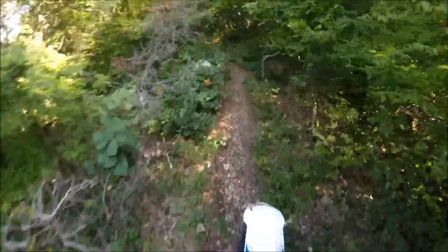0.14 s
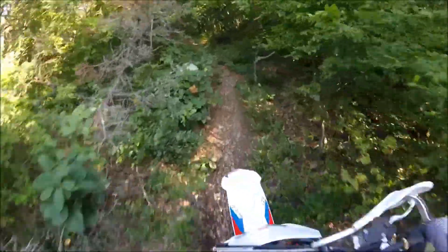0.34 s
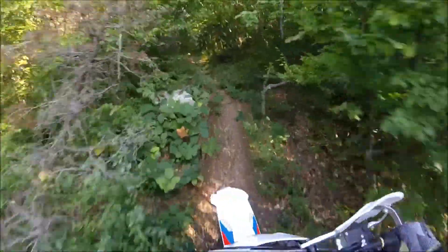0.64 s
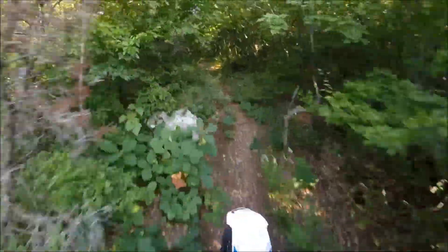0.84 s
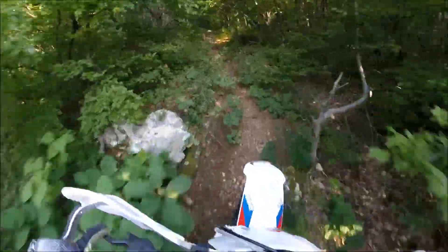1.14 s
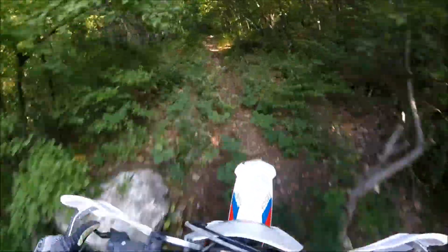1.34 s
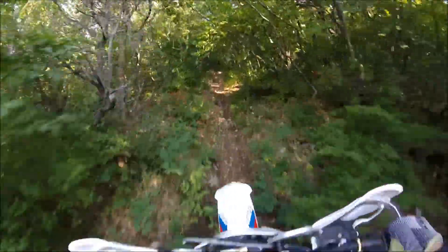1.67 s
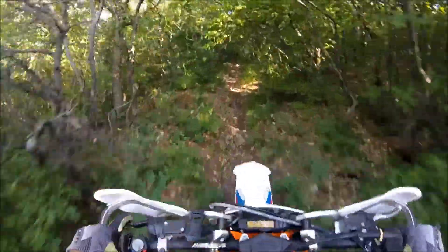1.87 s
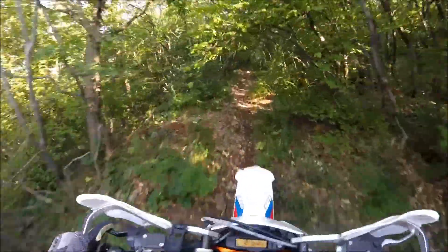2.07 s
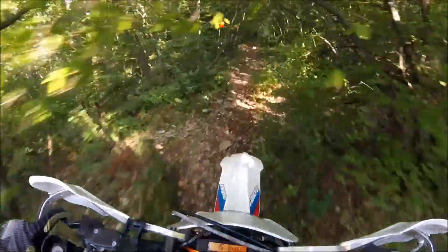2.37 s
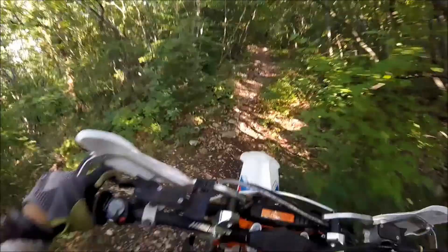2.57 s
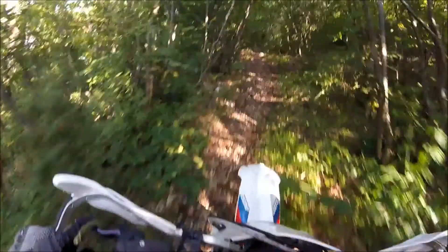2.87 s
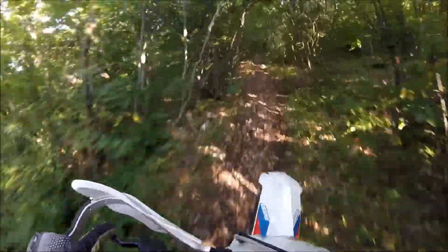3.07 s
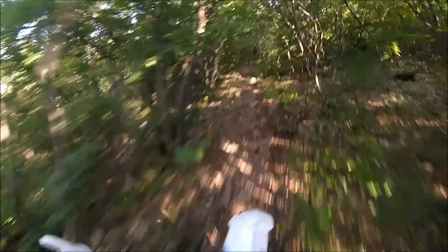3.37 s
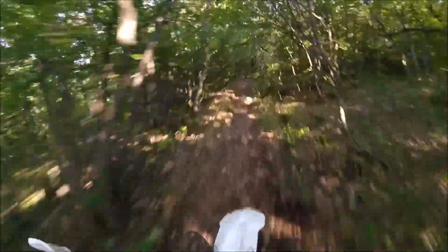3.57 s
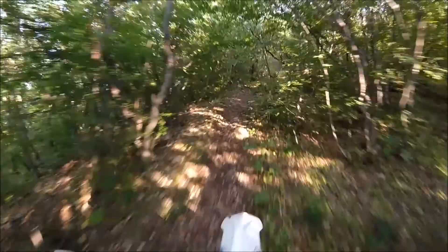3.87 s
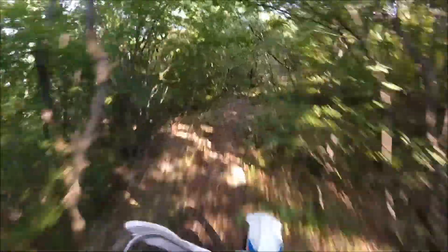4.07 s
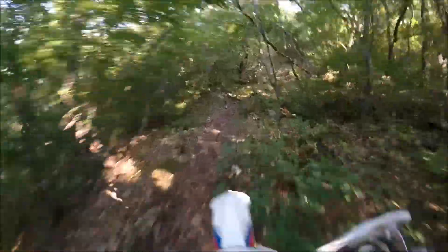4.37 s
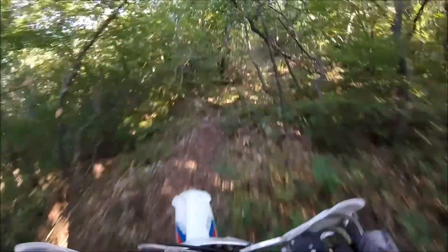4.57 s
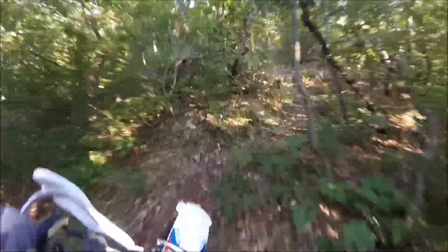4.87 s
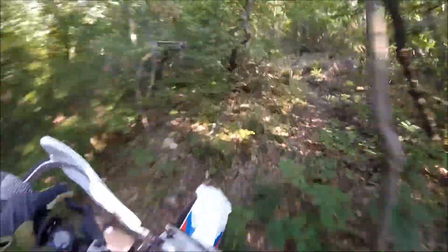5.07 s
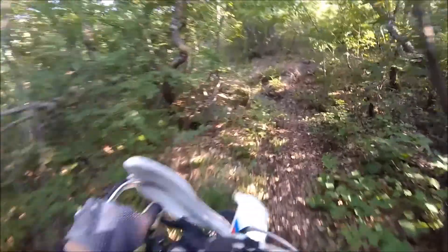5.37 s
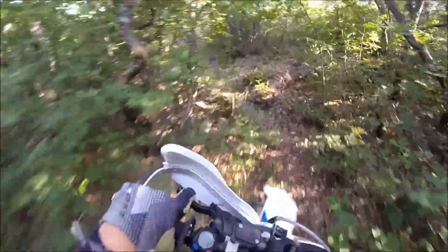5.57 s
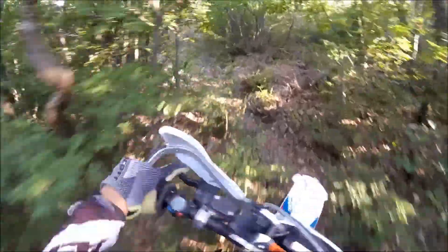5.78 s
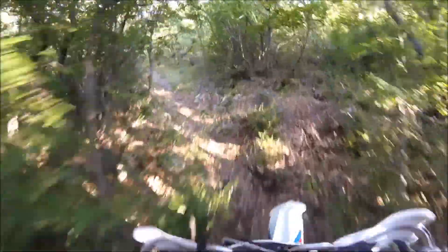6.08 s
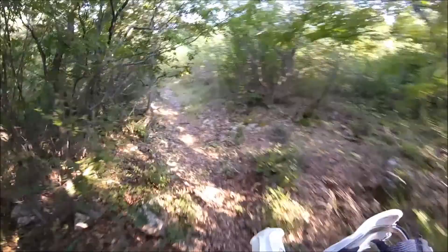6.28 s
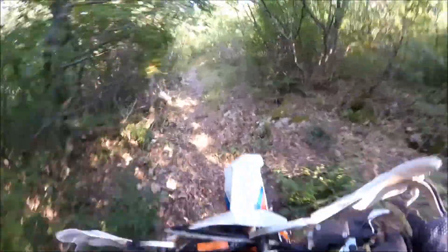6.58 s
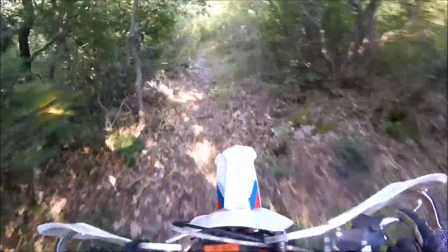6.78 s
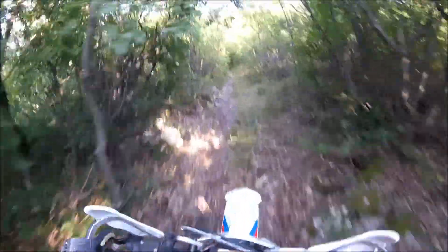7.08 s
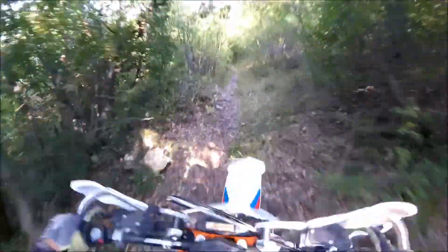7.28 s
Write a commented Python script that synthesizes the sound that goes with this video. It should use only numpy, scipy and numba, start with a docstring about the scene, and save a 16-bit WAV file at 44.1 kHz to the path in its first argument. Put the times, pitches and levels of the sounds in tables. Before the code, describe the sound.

A two-stroke dirt bike rides up a forest trail, heard close from the rider's helmet. The engine sputters at low revs, pulls in short raspy bursts, and climbs to a high peak about halfway. It then drops back, popping, and labours at low revs with a thin metallic whine. Twigs knock on the helmet three times, light wind buffets the microphone, and the chain clatters near the end.

```python
"""A two-stroke dirt bike rides up a forest trail, heard from the rider's helmet.
Under throttle it fires once per turn of the crank, and the pulses ring the exhaust pipe into a drone;
at small openings it sputters in single pops. Rushing gas rasps, the air intake hums, the gears whine
and the engine's metal rings. Behind it the chain clatters, twigs knock on the helmet, a pebble ticks
off the frame and wind buffets the microphone."""
import sys
import numpy as np
from scipy import signal
from scipy.io import wavfile
from scipy.ndimage import uniform_filter1d
from numba import njit

SR = 44100
rng = np.random.default_rng(int(sys.argv[2]) if len(sys.argv) > 2 else 0)


def wav_record(signal):
    """Record a signal, one row per channel, as 16-bit PCM in the file named by sys.argv[1]."""
    frames = np.transpose(np.atleast_2d(signal))
    bounded = np.clip(frames, -1, 1)
    # unit amplitude maps onto the largest positive 16-bit level
    quanta = np.round(bounded * 32767).astype(np.int16)
    wavfile.write(sys.argv[1], SR, quanta)


N = 327222
TIME = np.arange(N) / SR

# Wind on the microphone: time_s, level_db
WIND_LEVEL = [(0, -28), (0.95, -29), (1.12, -24), (1.3, -29), (1.7, -38), (2.3, -33), (2.9, -37),
              (3.5, -39), (3.9, -31), (4.2, -36), (4.9, -39), (5.2, -32), (6.45, -32), (6.75, -27),
              (7.42, -24)]
# Jolts that push air at the microphone: start_s, level_db, pitch_hz
JOLTS = [(4.533, -13, 64.5), (4.547, -9, 63.5), (4.563, -14, 63), (4.581, -12.5, 62), (4.809, -17.5, 27.1),
         (5.239, -14, 25.2), (5.28, -39, 24.42), (5.317, -18, 30.2)]
# Tone of the wind (a tone says how strong each frequency is): frequency_hz, gain_db
WIND_TONE = [(4, -34), (18, -8), (32, -3), (50, -6), (80, -10), (150, -12), (400, -12), (2000, -60)]
# Notes of the struck frame and helmet: pitch_hz, level_db, ring_s (time to fade by 60 dB)
FRAME_NOTES = [(2450, 2, 0.0093), (2860, -10, 0.0093), (4700, -18, 0.02)]
HELMET_NOTES = [(390, 14, 0.017), (615, -3, 0.15), (780, 5, 0.015), (1123, -7, 0.19), (1736, 6.5, 0.037),
                (2140, 3, 0.03), (2340, -3, 0.058), (3930, 8.5, 0.008), (5060, 14.5, 0.017)]
# Twigs hitting the helmet: start_s, crack_db, thud_db, scrape_s
TWIG_HITS = [(1.116, -16, -15, 0.0083), (1.134, -27, -32, 0.015), (1.156, -28, -35, 0.014),
             (2.6057, -19, -43, 0.0073), (2.6116, -16, -8, 0.0073), (2.662, -13.5, -16, 0.011),
             (2.6783, -22, -15, 0.0038), (2.693, -18.5, -23, 0.01), (2.703, -25.5, -23, 0.009),
             (4.5275, -6.5, -38, 0.0027), (4.5305, -9, -33, 0.0057), (4.5425, -23, -19, 0.008),
             (4.548, -20, -12.5, 0.012), (4.56, -28, -16, 0.008), (4.5677, -17, -20, 0.007)]
# Tones of a twig's crack, its thud and the chain: frequency_hz, gain_db
CRACK_TONE = [(150, -33), (500, -27), (1200, 13), (1500, -14), (2100, 13), (3800, -7), (5200, 10),
              (6500, 5), (8000, -6), (9500, -16.5), (11000, -29)]
THUD_TONE = [(30, -23), (80, -4), (280, 2), (550, -3), (1000, -12.5), (3000, -110)]
CHAIN_TONE = [(400, -24.5), (950, 10), (1550, -3), (2100, 0.5), (3800, -19.5), (6200, -6.5), (11000, -48)]
# Chain clatter over rough ground: time_s, level_db
CHAIN_LEVEL = [(6.4, -64), (6.6, -37), (6.85, -25.5), (7.42, -26.5)]

# Engine speed, in turns of the crank per second: time_s, speed_hz
ENGINE_SPEED = [(0.0, 44.9), (0.06, 43.2), (0.14, 62.0), (0.25, 52.9), (0.35, 58.0), (0.43, 42.1),
                (0.54, 41.4), (0.74, 45.2), (0.85, 42.0), (0.97, 53.1), (1.07, 45.8), (1.22, 55.1),
                (1.45, 56.0), (1.53, 65.5), (1.58, 66.0), (1.65, 73.5), (1.71, 73.3), (1.8, 78.2),
                (1.92, 65.1), (2.03, 65.6), (2.12, 53.2), (2.23, 52.2), (2.34, 55.0), (2.43, 53.4),
                (2.5, 60.0), (2.56, 60.5), (2.64, 66.3), (2.75, 57.8), (2.79, 66.8), (2.91, 60.2),
                (2.99, 74.0), (3.06, 69.2), (3.15, 80.5), (3.2, 77.6), (3.25, 77.8), (3.32, 75.0),
                (3.37, 82.5), (3.43, 108.5), (3.475, 125.5), (3.554, 116.3), (3.642, 119.7), (3.686, 106.9),
                (3.76, 85.0), (3.86, 65.0), (3.95, 88.0), (4.0, 87.0), (4.08, 67.5), (4.2, 63.0),
                (4.4, 58.0), (4.73, 53.2), (4.83, 47.7), (5.08, 42.5), (5.41, 45.1), (5.62, 38.0),
                (5.89, 43.2), (6.1, 40.5), (6.3, 42.5), (6.45, 38.1), (6.68, 44.9), (6.78, 37.6),
                (6.96, 43.5), (7.05, 36.3), (7.23, 33.8), (7.42, 41.2)]
# Stretches of open throttle; overlapping rows continue one pull with a new tone or loudness:
# start_s, end_s, drone_db, hum_db, rasp_and_ring_db, lower_note_ratio, upper_note_ratio,
# note_width_hz, echo_share. The ratios times engine speed give the pipe's notes.
THROTTLE_STRETCHES = [(-0.03, 0.52, -4.5, -4.5, -3, 5.6, 15, 40, 0),
                      (0.045, 0.165, -1, 6.5, -1, 3.6, 11, 40, 0.17),
                      (0.223, 0.333, 2, 0.5, -8, 5.6, 7.7, 40, 0.21),
                      (0.486, 0.965, -2.5, -0.5, 0, 6.4, 8, 32, 0.5),
                      (1.036, 1.455, 2, 1.5, 2.5, 4.65, 9.5, 73.4, 0),
                      (1.43, 1.63, 0.5, 1, 1.5, 4.44, 4.67, 60, 0),
                      (1.592, 1.783, -1, -1, 1.5, 3.8, 4.88, 69, 0.039),
                      (1.954, 2.456, -0.5, 1, 0.5, 4.05, 7.4, 32.6, 0),
                      (2.387, 2.547, 1.5, -3, 0, 4.25, 7.5, 36, 0.088),
                      (2.6, 2.666, -6, 2.5, -1.5, 4.2, 9, 32, 0.06),
                      (2.72, 2.79, -3, -10, -1, 4, 7.4, 32, 0),
                      (2.873, 3.427, -3, -8, -3.5, 3.71, 6.8, 36, 0.2),
                      (3.379, 3.635, 1.5, -8.5, -5.5, 2.67, 3.5, 60, 0.12),
                      (3.854, 3.971, -7, -10, -6.5, 3.38, 7, 32, 0.5),
                      (5.036, 5.482, -9, -10.5, -5.5, 5.6, 7.8, 32, 0.12),
                      (5.617, 6.234, -3, 2, 1, 6.2, 10, 32.8, 0.14),
                      (6.483, 6.688, -1.5, 3.5, 1.5, 6.4, 12, 32, 0.042),
                      (6.722, 7.01, -1.5, 3.5, 2.5, 6.1, 9, 33.3, 0.26),
                      (6.99, 7.27, -1.5, 7, 6, 6, 8, 32, 0.35),
                      (7.226, 7.45, -1, 6.5, 4, 6.7, 10.3, 32, 0.4)]
# How much the engine sputters: time_s, sputter_share (0 is clean running)
SPUTTER_SHARE = [(0, .2), (.09, .75), (.36, .9), (.45, .4), (.62, .08), (.88, .08), (.94, .4), (1.04, 0),
                 (2.6, 0), (2.68, .35), (2.93, 0), (3.8, 0), (4.9, .2), (5.05, .9), (5.5, .9), (5.72, .1),
                 (6.55, .15), (6.8, .05)]
# Lone hard firings of built-up unburnt fuel: time_s, pop_db, knock_db
LONE_POPS = [(0.1541, -31, -32), (0.293, -22, -32.5), (0.3264, -17, -32.5), (0.3986, -17, -30),
             (0.464, -15, -33), (0.507, -10, -27), (0.5532, -11, -37), (0.5974, -27, -39),
             (0.937, -7.5, -36), (0.972, -13, -36), (1.996, -10.5, -40), (2.0091, -21, -25.5),
             (2.863, -12.5, -31), (3.8896, -9.5, -49), (4.4051, -14.5, -29), (4.469, -16, -43),
             (4.505, -15, -44), (4.646, -18.5, -52), (4.9433, -18, -35.5), (5.095, -26, -31),
             (5.1584, -16, -33), (5.2256, -19, -31), (5.286, -20, -32.5), (5.3549, -31, -28.5),
             (5.427, -13.5, -28.5), (5.4679, -16, -28), (5.699, -7, -45), (6.346, -17, -29),
             (6.455, -15.5, -30), (6.478, -13, -45), (6.5359, -10.5, -45), (6.656, -19, -35)]
# Exhaust with the throttle open: speed_hz, drone_db
OPEN_DRONE = [(34, -19.5), (40, -16.5), (44, -16), (52, -18.5), (56, -16), (61, -12), (68, -13), (75, -15),
              (88, -13), (115, -13)]
# Other engine sounds with the throttle open: speed_hz, hum_db, rasp_db, ring_db
OPEN_LEVELS = [(36.3, -32.5, -32, -37), (39.5, -28, -31, -34.5), (61, -29, -25, -33),
               (61.1, -35.5, -26.5, -35), (78.8, -18.5, -22, -28.5), (113, -15.5, -16, -24)]
# The engine with the throttle shut: speed_hz, hum_db, rasp_db, ring_db, drone_db
SHUT_LEVELS = [(40.2, -39.5, -36.5, -38.5, -44), (46.5, -37.5, -39.5, -45.5, -38.5),
               (51.3, -38.5, -41, -44.5, -41), (61.4, -27, -33.5, -40.5, -36), (81, -32, -32.5, -38.5, -40)]
# Gear whine, loudest at low pitch and mostly weaker as it rises: pitch_hz, gain_db
WHINE_TONE = [(900, -8), (1200, -9.5), (1360, -15.5), (1550, -18), (2050, -12), (2600, -26)]
# A metal engine part sings: start_s, end_s, first_hz, last_hz, level_db
SINGING_NOTES = [(0.28, 0.433, 1300, 1295, -43), (0.54, 0.92, 1150, 1150, -40.5),
                 (0.953, 1.05, 1600, 1330, -36.5), (1.05, 1.237, 1240, 1450, -29),
                 (1.24, 1.365, 1440, 1370, -33.5), (1.598, 1.816, 890, 930, -35),
                 (2.04, 2.483, 1306, 1336, -34), (2.914, 3.363, 893, 910, -37),
                 (3.385, 3.488, 2020, 2080, -29), (3.935, 4.016, 2130, 2050, -38),
                 (4.151, 4.275, 1355, 1270, -41), (4.898, 5.627, 1290, 1270, -45.5),
                 (5.795, 6.01, 1250, 1230, -42), (6.89, 7.012, 1300, 1266, -32.5)]
# Tones of the ringing cylinder and the sizzling gas: frequency_hz, gain_db
CYLINDER_TONE = [(2000, -2), (3500, -10), (4300, -14.5), (5000, -5), (5800, 0), (6250, -2.5), (6570, 5.5),
                 (6900, -2.5), (7500, -9), (8500, -11.5), (10000, -21), (11500, -35)]
SIZZLE_TONE = [(5000, -31), (8500, 7), (10000, 1), (11500, -5.5)]
# The sizzle grows near top speed: speed_hz, gain_db
SIZZLE_LEVEL = [(50, -41), (75, -50), (115, -26)]
# Tones of a gas pulse's front and the jet behind it: frequency_hz, gain_db
FRONT_TONE = [(400, -10.5), (650, 7.5), (880, 5), (1100, 1), (1320, 10.5), (1500, 3.5), (1750, -2.5),
              (2100, -9), (2700, -12), (5000, -51.5)]
JET_TONE = [(100, -40), (300, -14.5), (600, 1.5), (950, -4.5), (1120, -4), (1250, -4), (1360, -5),
            (1480, -9), (1600, -14), (2100, -9), (2700, -17), (3400, -23), (4200, -23), (8000, -39.5),
            (12000, -93)]
# How far the fronts stand out of the jet when pulling hard: speed_hz, gain_db
FRONT_LEVEL = [(42, -4), (54, 1.5), (68, 1), (80, 2), (115, 4)]
# Tones of the air intake, throttle open and shut: frequency_hz, gain_db
OPEN_INTAKE_TONE = [(35, 15), (55, 20), (80, 27), (125, 14), (170, 22), (210, -15), (260, -20), (330, 0),
                    (560, 11), (700, 2)]
SHUT_INTAKE_TONE = [(40, 2), (65, -3), (120, 2.5), (180, -7.5), (250, -25), (330, -16.5), (480, -10),
                    (700, -22)]
# Tones of the exhaust's pops and drone: frequency_hz, gain_db
POP_TONE = [(50, -65.5), (140, -3), (210, 3), (285, 8.5), (345, -2), (420, -15), (540, -4), (720, -24),
            (2500, -66)]
PIPE_TONE = [(60, -56), (170, -0.5), (215, 8), (255, 13), (300, 8), (360, 2.5), (420, 0), (490, 1.5),
             (560, -2), (680, -25.5), (900, -14), (1400, -4), (3000, -70)]
# Upper limit of the pipe's lower note: speed_hz, pitch_hz
LOWER_NOTE_LIMIT = [(78, 350), (112, 330)]


def amp(db):
    """Turns decibels into a gain."""
    return 10 ** (np.asarray(db) / 20)


def evened(x):
    """Scales a signal to an average (rms) level of 1."""
    return x / np.sqrt(np.mean(x ** 2) + 1e-20)


def local_level(x, size=2200):
    """The level, averaged over a few engine turns."""
    return np.sqrt(abs(uniform_filter1d(uniform_filter1d(x ** 2, size), size)) + 1e-16)


def curve(rows):
    """Joins a table's points in time into one value per sample."""
    return np.interp(TIME, *np.transpose(rows))


def at_speed(rows, column=1):
    """Looks up a column by the engine's speed at every sample."""
    rows = np.asarray(rows)
    return np.interp(curve(ENGINE_SPEED), rows[:, 0], rows[:, column])


def gain_at(tone, hz):
    """A tone's gain at the given frequencies."""
    frequency_hz, gain_db = np.transpose(tone)
    return amp(np.interp(np.log(hz + 1), np.log(frequency_hz + 1), gain_db))


def response(tone, size=4096):
    """What one click sounds like through a tone (a minimum-phase filter)."""
    log_gain = np.log(gain_at(tone, abs(np.fft.fftfreq(2 * size, 1 / SR))))
    spectrum = np.exp(np.conj(signal.hilbert(log_gain)))
    return np.fft.ifft(spectrum).real[:size]


def colour(x, tone):
    """Filters a sound to give it a tone."""
    return signal.oaconvolve(x, response(tone))[:N]


def colour_noise(x, tone):
    """Gives white noise a tone while keeping its level."""
    return colour(x, tone) / np.linalg.norm(response(tone))


def clicks(times, sizes):
    """One click at each time, of the given size."""
    out = np.zeros(N)
    np.add.at(out, np.clip(np.round(times * SR).astype(int), 0, N - 1), sizes)
    return out


def puffs(train, decay_s, steady=0):
    """Noise that flares with each click and dies back to a steady level."""
    flare = signal.lfilter([1], [1, -np.exp(-1 / (decay_s * SR))], train)
    return (steady + flare) * rng.standard_normal(N)


def struck(notes):
    """The dying ring of an object after one blow."""
    t = TIME[:4096]
    return sum(amp(db - 60 * t / ring_s) * np.sin(2 * np.pi * hz * t) for hz, db, ring_s in notes)


@njit
def ring_on(x, pole):
    """Keeps a vibration going: at each sample the pole turns it and fades it a little."""
    out, state = np.zeros(len(x)), 0j
    for n in range(len(x)):
        state = state * pole[n] + x[n]
        out[n] = state.real
    return out


def resonate(x, hz, width_hz):
    """Makes a sound ring at a pitch that can slide; a narrower width rings longer."""
    fade = np.exp(-np.pi * width_hz / SR)
    return 2 * ring_on((1 - fade) * x + 1e-18, fade * np.exp(2j * np.pi * hz / SR))


def wind():
    """Air rumbles on the microphone, with a short swing of pressure at each jolt."""
    air = evened(colour(rng.standard_normal(N), WIND_TONE)) * amp(curve(WIND_LEVEL))
    for start_s, db, hz in JOLTS:
        cycles = np.clip((TIME - start_s) * hz, 0, 8)
        air += amp(db) * np.sin(2 * np.pi * cycles) * np.exp(-cycles ** 2)
    return air


def pebble(start_s=2.7487, level_db=-16.5):
    """A pebble strikes the frame with one short, bright tick."""
    return signal.oaconvolve(clicks(np.array([start_s]), amp(level_db)), struck(FRAME_NOTES))[:N]


def twigs(edge_db=13, blow_db=18):
    """Each twig hits the helmet with a sharp edge, scrapes briefly, rings the shell and thuds."""
    start_s, crack_db, thud_db, _ = np.transpose(TWIG_HITS)
    rub = sum(amp(db) * (TIME >= at) * np.exp(-abs(TIME - at) / scrape_s)
              for at, db, _, scrape_s in TWIG_HITS)
    scrape = rub * rng.standard_normal(N) + clicks(start_s, amp(crack_db + edge_db))
    crack = colour_noise(scrape, CRACK_TONE)
    shell = struck(HELMET_NOTES)
    softened = signal.sosfilt(signal.butter(4, 7500, fs=SR, output="sos"), scrape)
    ring = signal.oaconvolve(softened, shell / np.linalg.norm(shell))[:N]
    push = puffs(clicks(start_s, amp(thud_db)), decay_s=0.017) + clicks(start_s, amp(thud_db + blow_db))
    thud = colour_noise(push, THUD_TONE)
    return amp(-2) * crack + amp(-3) * ring + amp(-2) * thud


def chain(slaps_per_s=32, spread_db=2):
    """Chain links slap their guide at uneven moments, each a short burst of noise."""
    jitter, strength = rng.standard_normal((512, 2)).T
    times = (np.arange(512) + jitter / 2) / slaps_per_s
    sizes = amp(spread_db * np.clip(strength, -2, 1))
    heard = times < TIME[-1]
    slaps = puffs(clicks(times[heard], sizes[heard]), decay_s=0.0095)
    return colour_noise(slaps, CHAIN_TONE) * amp(curve(CHAIN_LEVEL))


def crank():
    """Counts the crank's turns and finds when the exhaust port opens, once a turn."""
    wobble = evened(np.interp(TIME * 40, np.arange(4096), rng.standard_normal(4096)))
    turns = np.cumsum(curve(ENGINE_SPEED) * (1 + .002 * wobble)) / SR
    # Nudge the turns so that every lone pop lands on an opening.
    pop_s = np.array(LONE_POPS)[:, 0]
    offsets = np.unwrap(np.interp(pop_s, TIME, turns), period=1)
    turns -= np.interp(TIME, pop_s, offsets)
    return turns, TIME[1:][np.diff(np.floor(turns)) > 0]


def firings(port_s, spread_db=4, jitter_s=0.00058):
    """One firing a turn, uneven in strength and timing when the engine sputters."""
    sputter = np.interp(port_s, *np.transpose(SPUTTER_SHARE))
    strength, timing = rng.standard_normal((1024, 2))[:len(port_s)].T
    sizes = amp(np.clip(strength, -2, 1) * spread_db * sputter)
    return port_s + jitter_s * sputter * timing, sizes, sputter


def throttle(column, fall_s, swell_db_per_s=0, rise_s=0.049):
    """The gain of one engine sound: each stretch rises, slopes and dies away; the loudest wins."""
    t = TIME[::64]
    gain = np.zeros(len(t))
    for stretch in THROTTLE_STRETCHES:
        start_s, end_s = stretch[:2]
        held_s = np.clip(t - start_s, 0, end_s - start_s)
        shape = np.minimum(held_s / rise_s, 1) * np.exp(-np.maximum(t - end_s, 0) / fall_s)
        gain = np.maximum(gain, shape * amp(stretch[column] + swell_db_per_s * held_s))
    return np.interp(TIME, t, gain)


def engine_levels():
    """Speed and throttle set how loud the drone, open and shut intake, rasp and ring are."""
    shut_hum, shut_rasp, shut_ring, shut_drone = (amp(at_speed(SHUT_LEVELS, c)) for c in (1, 2, 3, 4))
    open_hum, open_rasp, open_ring = (amp(at_speed(OPEN_LEVELS, c)) for c in (1, 2, 3))
    opening = throttle(column=2, fall_s=0.051)
    drone = np.hypot(amp(at_speed(OPEN_DRONE)) * opening, shut_drone)
    shut_hum *= np.clip(1 - 2 * opening, 0, 1)
    open_hum *= throttle(column=3, fall_s=0.074, swell_db_per_s=3.5)
    open_rasp *= throttle(column=4, fall_s=0.17, swell_db_per_s=2)
    open_ring *= throttle(column=4, fall_s=0.26, swell_db_per_s=-1.5)
    return drone, open_hum, shut_hum, np.maximum(open_rasp, shut_rasp), np.maximum(open_ring, shut_ring)


def gear_whine(beats, level, cycles_per_turn=26.1, width_hz=160):
    """The gears, shaken by the firings, give a rough whine that slides with engine speed."""
    hz = cycles_per_turn * curve(ENGINE_SPEED)
    shake = evened(beats) + 1.3 * rng.standard_normal(N)
    ring = resonate(resonate(shake, hz, width_hz), hz, width_hz)
    return evened(ring) * level * gain_at(WHINE_TONE, hz)


def singing_metal(beats, width_hz=90, fade_s=0.028):
    """The firings shake a metal part, whose thin note fades in, slides and fades out."""
    notes = np.array(SINGING_NOTES)
    hz = np.interp(TIME, notes[:, :2].ravel(), notes[:, 2:4].ravel())
    swell = sum(amp(db) * np.clip(np.minimum(TIME - start_s, end_s - TIME) / fade_s, 0, 1)
                for start_s, end_s, _, _, db in notes)
    shake = evened(beats) + .4 * rng.standard_normal(N)
    ring = resonate(resonate(shake, hz, width_hz), hz, width_hz)
    return ring / local_level(ring) * swell


def cylinder(fire_s, sizes, level, lead_s=0.0058):
    """Burning fuel and the piston ring the metal just before each pulse; lone pops add a knock."""
    pop_s, _, knock_db = np.transpose(LONE_POPS)
    ring = colour(puffs(clicks(fire_s - lead_s, sizes), decay_s=0.011, steady=0.33), CYLINDER_TONE)
    knock = colour_noise(puffs(clicks(pop_s - lead_s, amp(knock_db)), decay_s=0.011), CYLINDER_TONE)
    return ring / local_level(ring) * level + knock


def sizzle(beats, level):
    """The fastest gas makes a fine hiss at the mouth of the pipe."""
    hiss = colour(puffs(beats, decay_s=0.004, steady=0.15), SIZZLE_TONE)
    return hiss / local_level(hiss) * level * amp(at_speed(SIZZLE_LEVEL))


def silencer(x, centres_hz=(430, 640, 900), width_hz=220):
    """The silencer's chambers delay some frequencies, smearing each pulse but keeping its tone."""
    fade = np.exp(-np.pi * width_hz / SR)
    for hz in centres_hz:
        feedback = np.array([1, -2 * fade * np.cos(2 * np.pi * hz / SR), fade ** 2])
        x = signal.lfilter(feedback[::-1], feedback, x)
    return x


def gas_rasp(beats, level, drone_level):
    """Each gas pulse has a sharp front, stronger with speed and load, and a noisy jet behind it."""
    sharpness = amp(at_speed(FRONT_LEVEL)) * np.interp(drone_level, amp([-30, -15]), [.55, 1])
    front = colour(silencer(beats), FRONT_TONE)
    jet = colour(puffs(beats, decay_s=0.026, steady=1), JET_TONE)
    gas = sharpness * front / local_level(front) + jet / local_level(jet)
    return gas / np.hypot(sharpness, 1) * level * amp(-2)


def intake(turns, level, tone):
    """The piston pumps air, firing or not: a smooth hum at the first nine multiples of its speed."""
    hz = curve(ENGINE_SPEED)
    hum = sum(gain_at(tone, k * hz) * np.cos(2 * np.pi * k * turns) for k in range(1, 10))
    return hum / local_level(hum) * level


def latest_stretch(times, column):
    """One column of the most recent stretch of open throttle at each time."""
    stretches = np.array(THROTTLE_STRETCHES)
    return stretches[np.searchsorted(stretches[:, 0], times) - 1, column]


def pipe(port_s, pulse_s, sizes):
    """Gas pulses, and their echoes half a turn later, ring two notes in the pipe's wide chamber."""
    speed_hz = curve(ENGINE_SPEED)
    lower_ratio, upper_ratio, width_hz = (latest_stretch(TIME, c) for c in (5, 6, 7))
    echoes = clicks(pulse_s + np.gradient(port_s) / 2, sizes * latest_stretch(port_s, column=8))
    pulses = clicks(pulse_s, sizes) + echoes
    lower = resonate(pulses, np.minimum(lower_ratio * speed_hz, at_speed(LOWER_NOTE_LIMIT)), width_hz)
    upper = resonate(pulses, upper_ratio * speed_hz, width_hz)
    return colour(pulses + 2.38 * lower + 2.2 * upper, PIPE_TONE)


def exhaust(port_s, fire_s, sizes, sputter, level):
    """A run of clean firings builds a drone in the pipe; sputters and lone firings just pop."""
    even_running = local_level(pipe(port_s, port_s, sizes=0.82))
    drone = pipe(port_s, fire_s, sizes * (1 - sputter)) / even_running * level
    pop_s, pop_db, _ = np.transpose(LONE_POPS)
    pops = clicks(pop_s, amp(pop_db)) + clicks(fire_s, sizes * sputter) * level * amp(7)
    return drone + colour(pops, POP_TONE) / abs(response(POP_TONE)).max()


def scene():
    """Mixes the engine, chain, twigs, pebble and wind into one channel."""
    turns, port_s = crank()
    fire_s, sizes, sputter = firings(port_s)
    drone_level, open_level, shut_level, gas_level, ring_level = engine_levels()
    beats = clicks(fire_s, 0.2)
    engine = exhaust(port_s, fire_s, sizes, sputter, drone_level)
    engine += intake(turns, open_level, OPEN_INTAKE_TONE)
    engine += intake(turns, shut_level, SHUT_INTAKE_TONE) * amp(-0.5)
    engine += gas_rasp(beats, gas_level, drone_level) + sizzle(beats, gas_level)
    engine += gear_whine(beats, gas_level) + singing_metal(beats) + cylinder(fire_s, sizes, ring_level)
    return (engine + chain() + twigs() + pebble() + wind())[None]


def record(dry):
    """Rounds off the loudest peaks and cuts the highest treble."""
    limited = dry / (1 + (dry / .8) ** 8) ** (1 / 8)
    treble_cut = signal.firwin(255, 11700, window=("kaiser", 9), fs=SR)
    return signal.oaconvolve(limited, treble_cut[None], "same")


dry = scene()
out = record(dry)
wav_record(out)
```